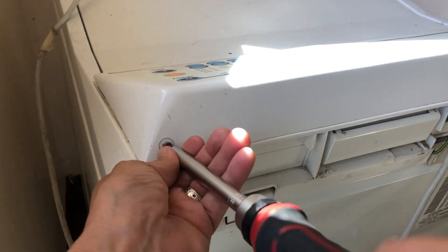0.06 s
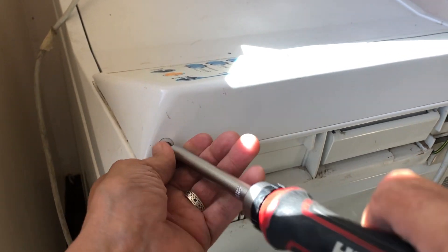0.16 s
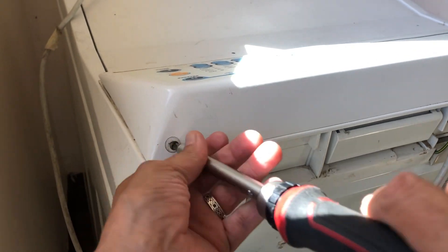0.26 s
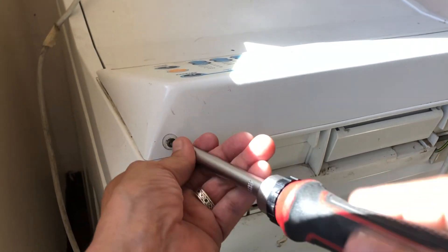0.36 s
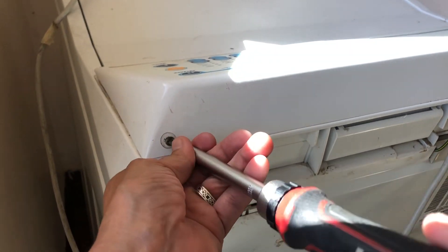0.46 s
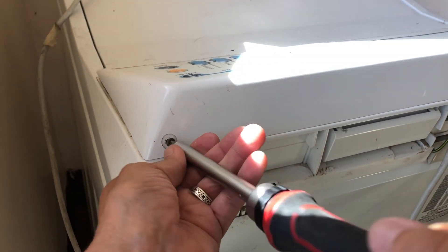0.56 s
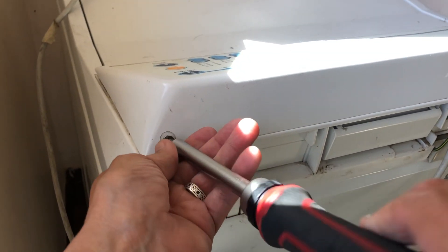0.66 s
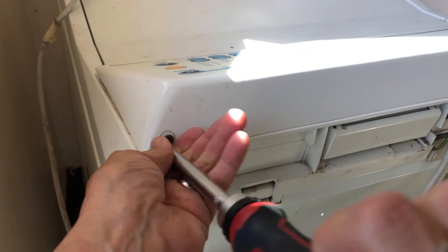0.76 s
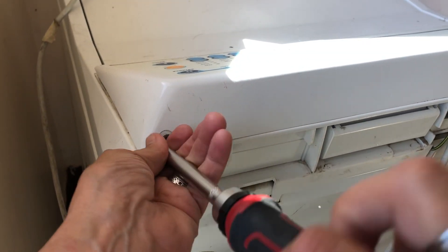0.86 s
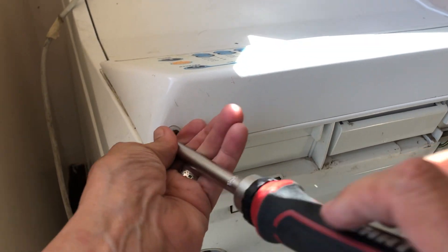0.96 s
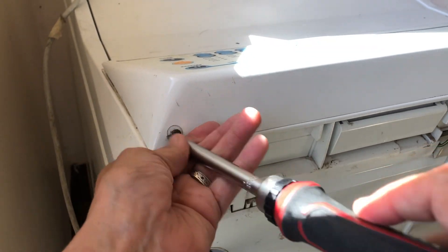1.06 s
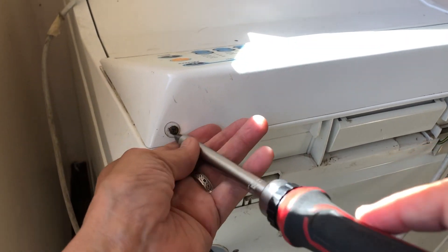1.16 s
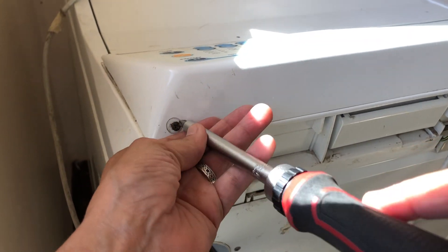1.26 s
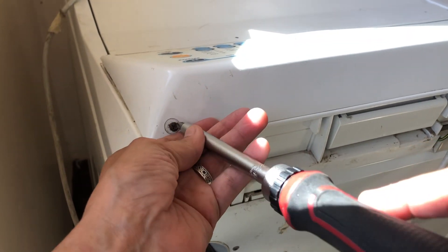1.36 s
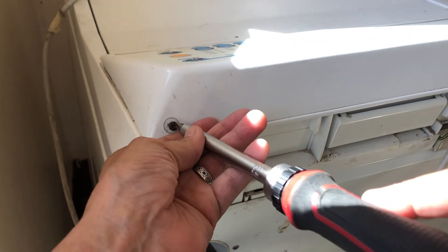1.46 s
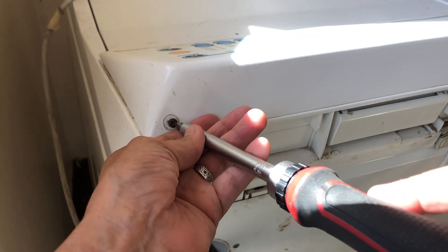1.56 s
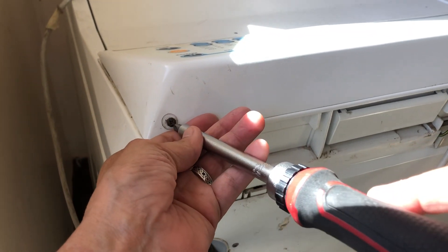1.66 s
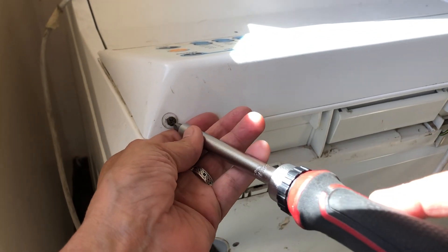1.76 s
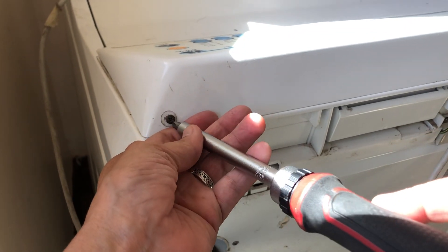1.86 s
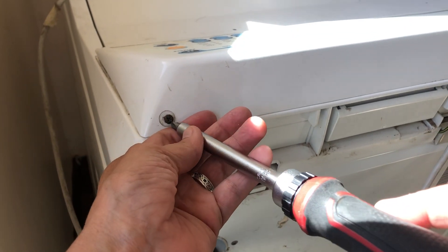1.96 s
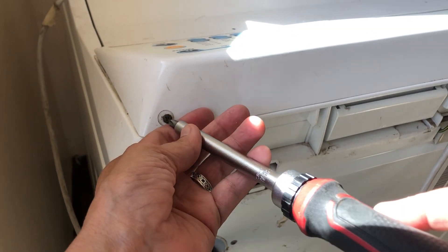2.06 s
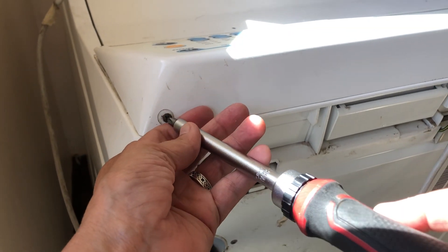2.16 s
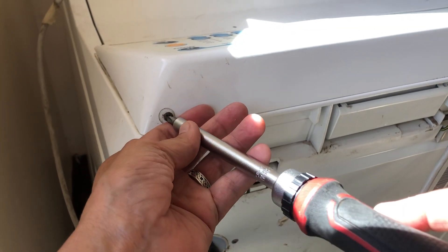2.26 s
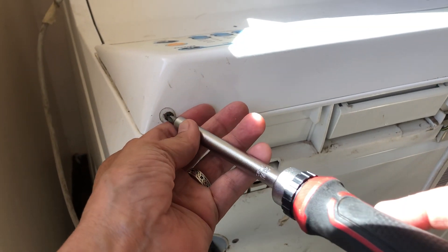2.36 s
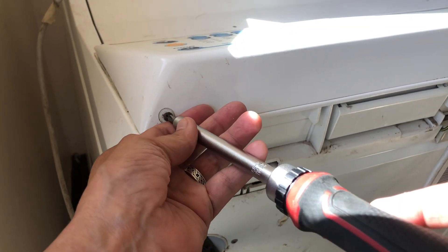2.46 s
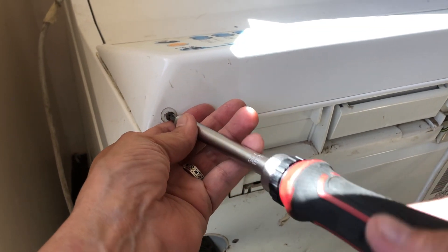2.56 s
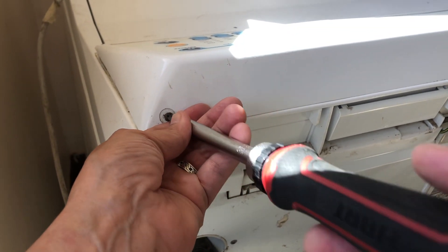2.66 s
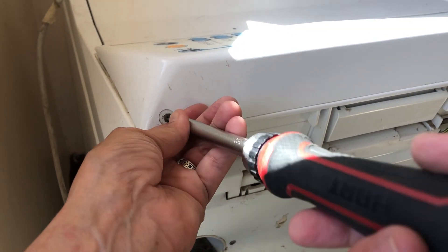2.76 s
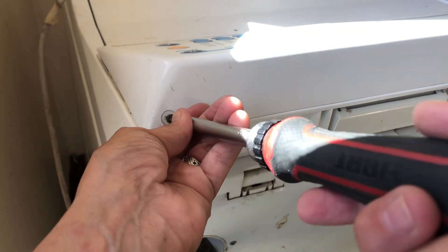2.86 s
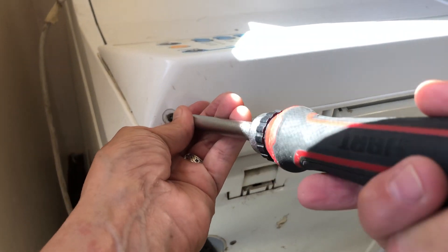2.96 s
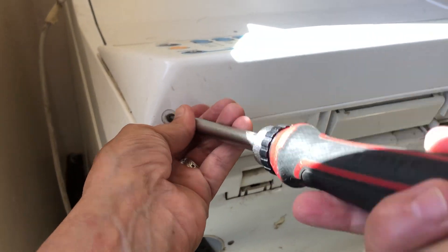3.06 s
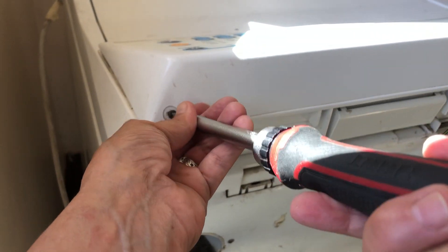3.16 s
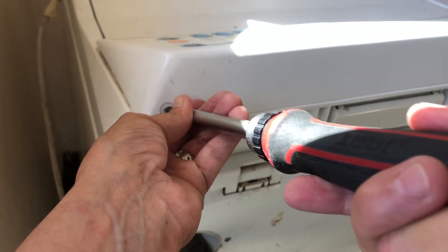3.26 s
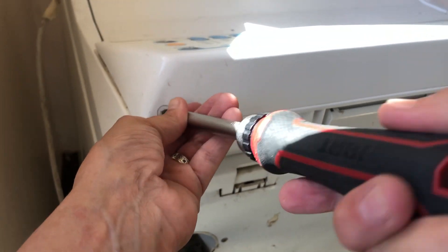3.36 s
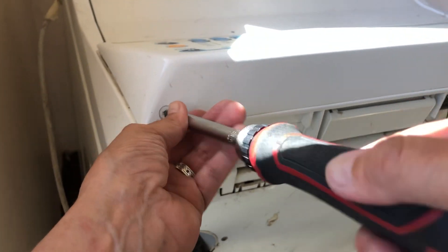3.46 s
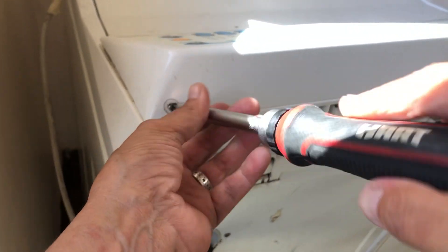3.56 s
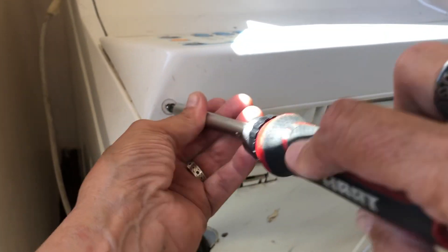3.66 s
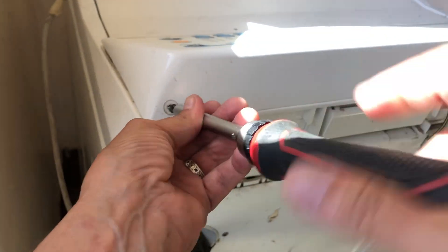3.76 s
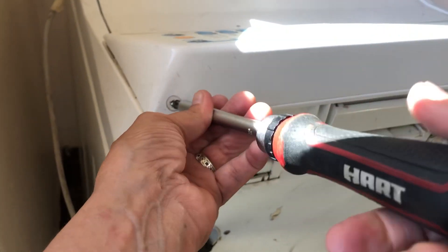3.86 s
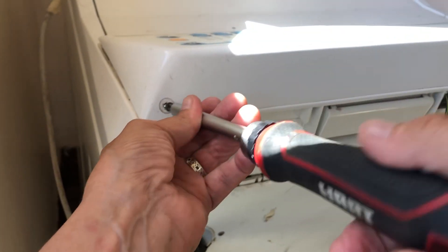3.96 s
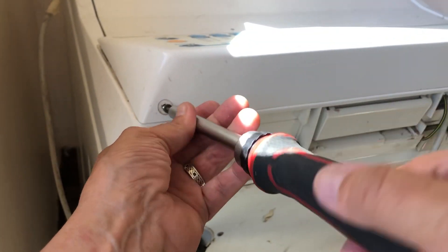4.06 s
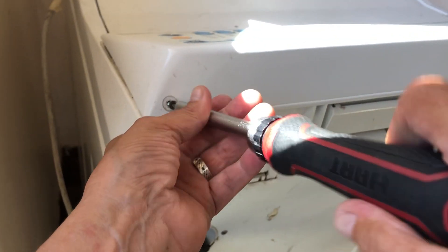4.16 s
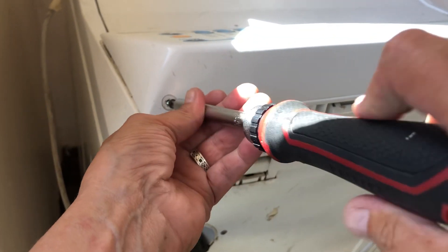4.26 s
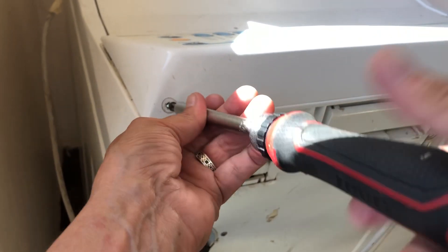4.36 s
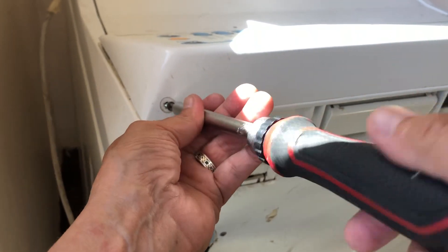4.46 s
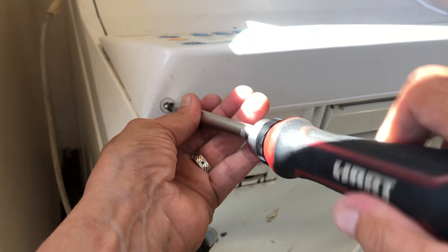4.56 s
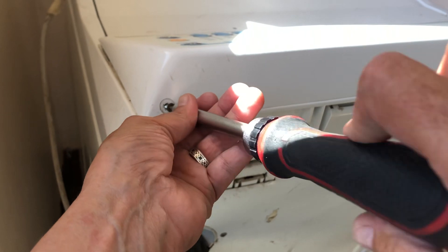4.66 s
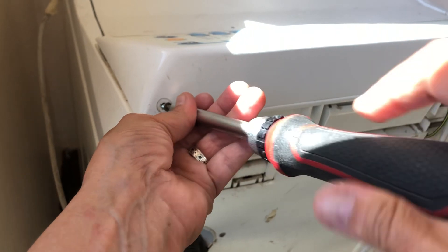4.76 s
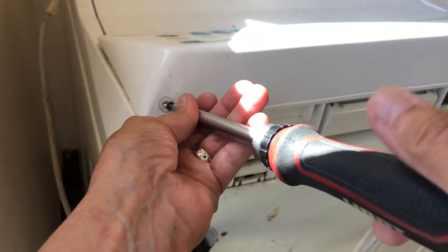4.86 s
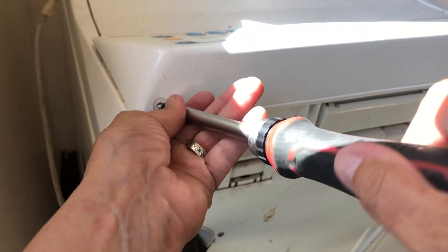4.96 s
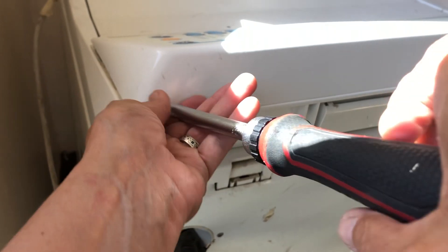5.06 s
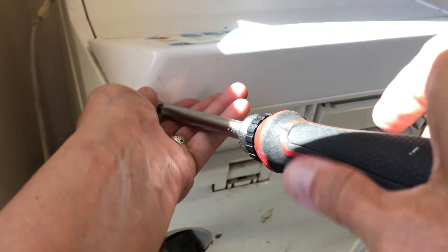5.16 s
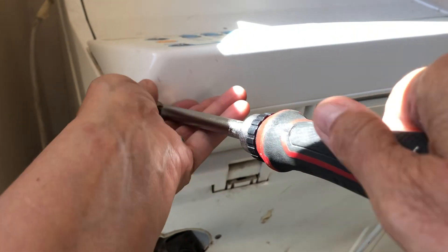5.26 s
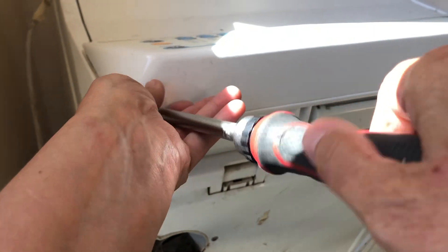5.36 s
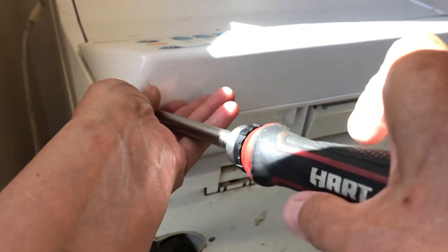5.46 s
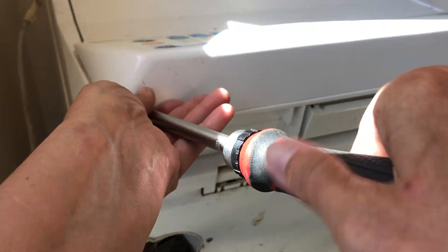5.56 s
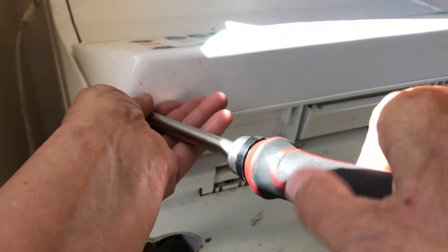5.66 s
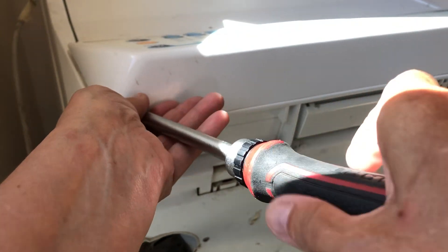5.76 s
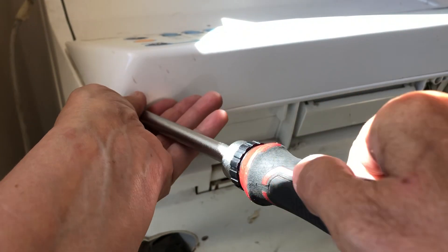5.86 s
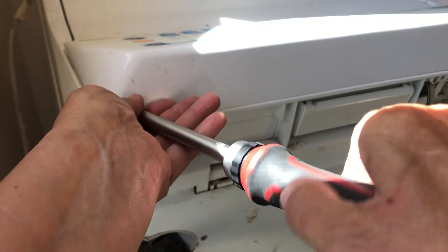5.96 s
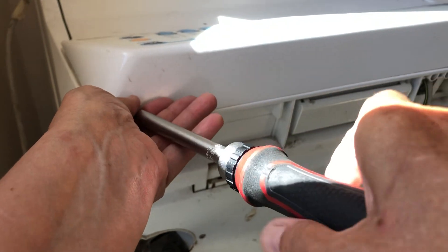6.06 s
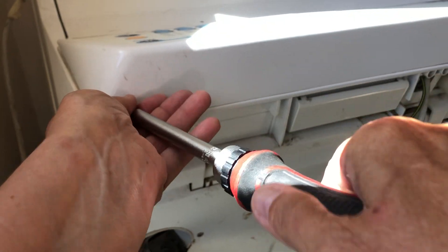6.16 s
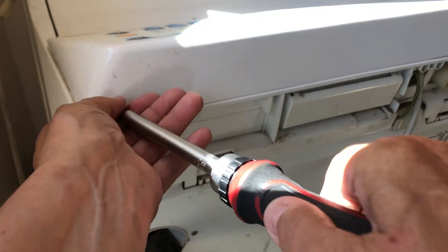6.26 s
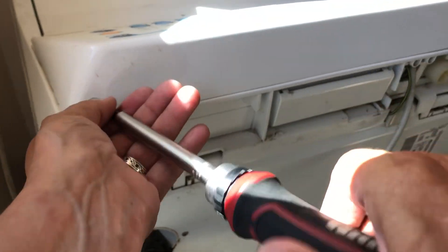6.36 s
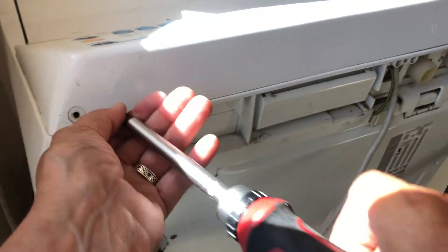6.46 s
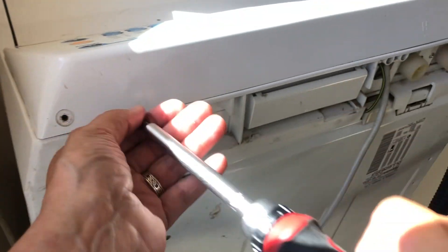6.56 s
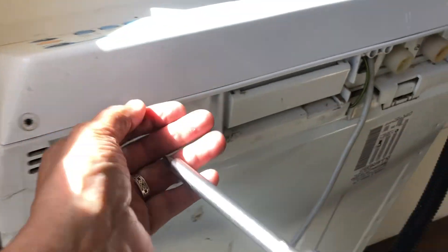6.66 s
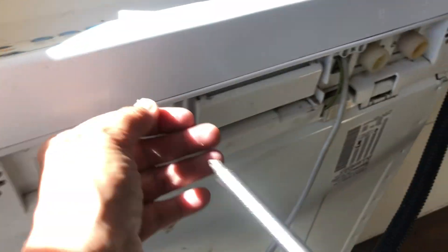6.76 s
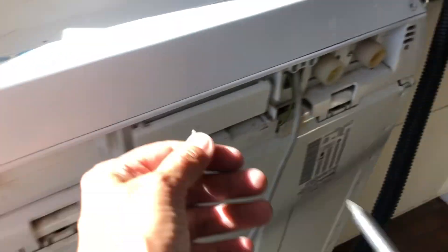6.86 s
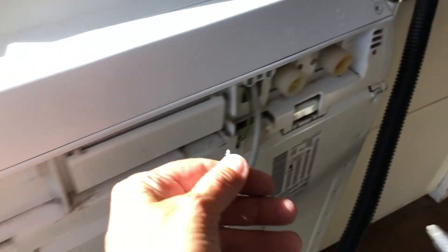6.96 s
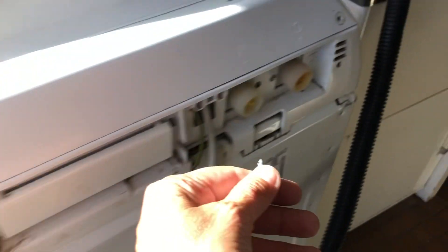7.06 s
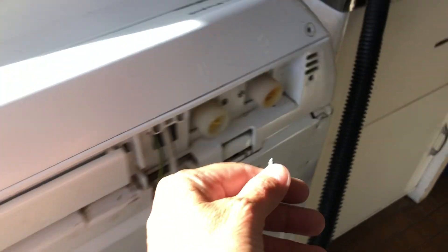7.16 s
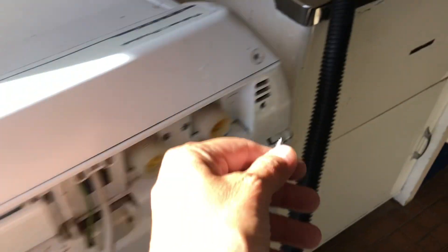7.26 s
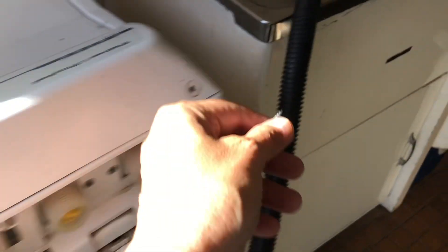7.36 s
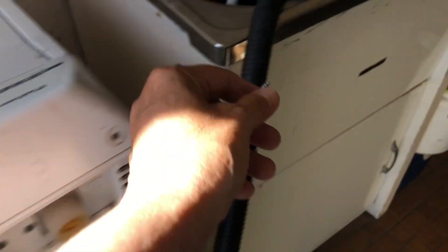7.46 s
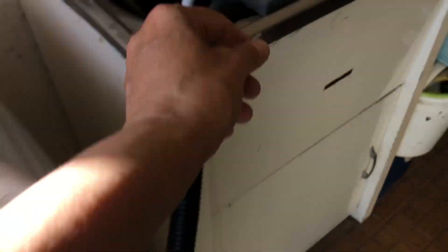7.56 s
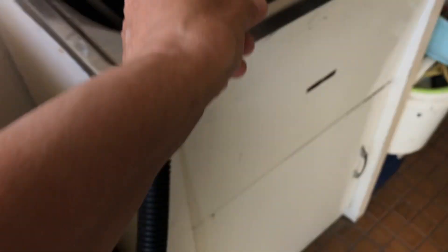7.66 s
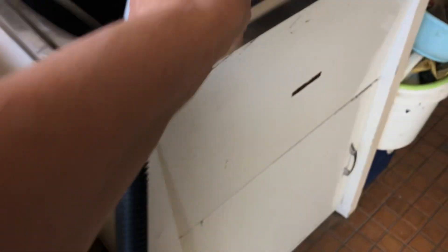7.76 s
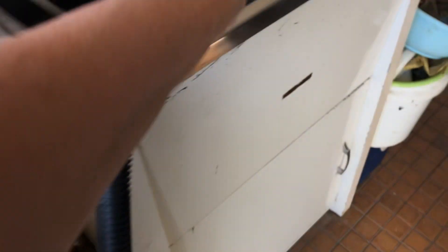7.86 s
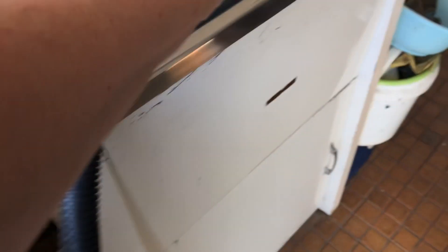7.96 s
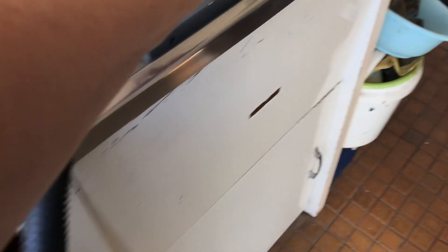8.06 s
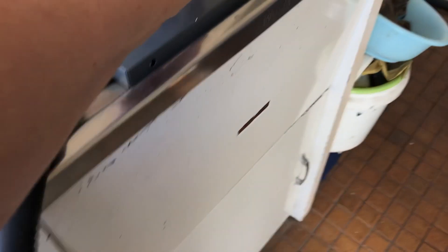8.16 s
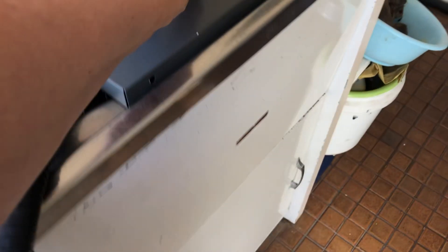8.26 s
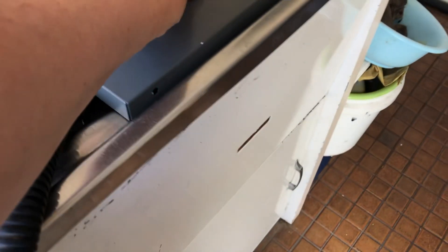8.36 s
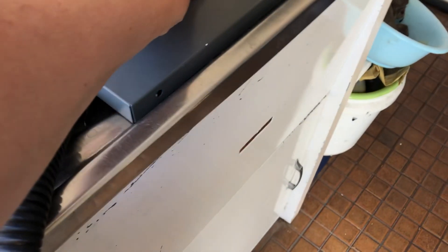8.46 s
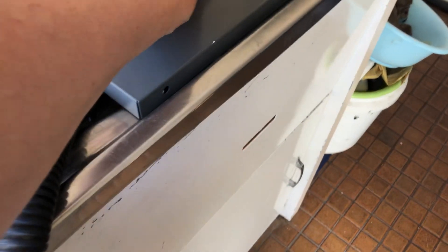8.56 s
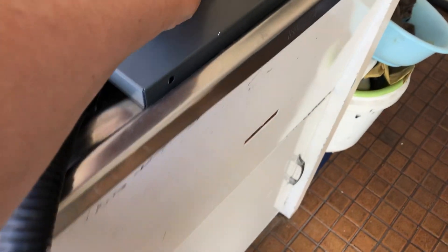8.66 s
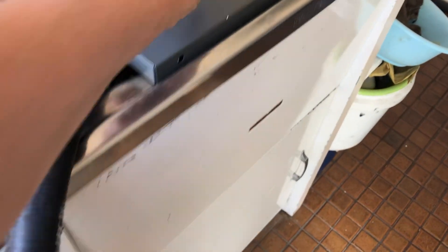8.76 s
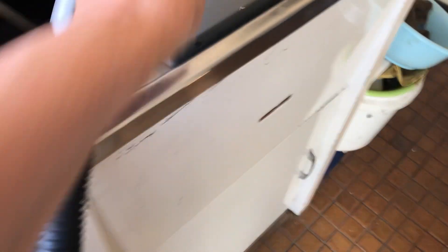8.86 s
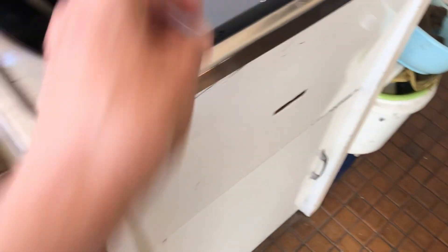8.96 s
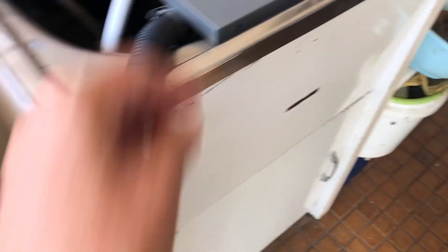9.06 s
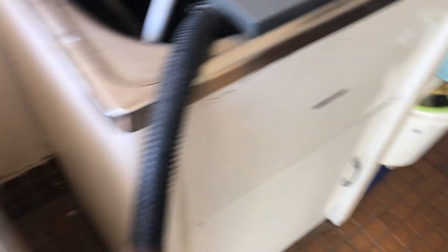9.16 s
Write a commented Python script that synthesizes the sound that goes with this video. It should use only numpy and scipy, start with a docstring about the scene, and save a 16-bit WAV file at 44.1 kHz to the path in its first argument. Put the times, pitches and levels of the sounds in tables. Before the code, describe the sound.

A ratchet screwdriver clicks and scrapes in a hollow metal appliance, then a small screw drops and bounces with a bright clatter on a hard top.

```python
"""A small hard room with a washing machine: a ratchet screwdriver backs a screw out of its plastic console.
The bit clicks and rings in the screw head, pushes boom in the hollow cabinet, and a palm slides round the grip.
Thread and skin squeak faintly, fingers bump the camera body, clothes rustle, and the screw drops on a hard top.
Struck parts are dying sines and decaying noise; sliding parts are grains of noise swelling with each stroke."""
import sys
import numpy as np
from scipy import signal
from scipy.io import wavfile
from scipy.ndimage import uniform_filter1d

SR = 44100
rng = np.random.default_rng(int(sys.argv[2]) if len(sys.argv) > 2 else 0)


def to_wav(sig):
    """Store sig (one row per channel, or 1-D mono) as 16-bit WAV at the path in sys.argv[1].

    Samples outside -1..1 are clipped; the rate is SR.
    """
    pcm = np.clip(np.atleast_2d(sig), -1, 1) * 32767
    pcm = np.round(pcm).astype(np.int16)
    wavfile.write(sys.argv[1], SR, pcm.T)  # frames by channels


N = 406602
TIME = np.arange(N) / SR
RING = np.arange(SR) / SR  # one second

# The bit catching in the screw head. Each row: start in seconds, relative strength in dB, main ring in Hz,
# main ring over the rest of the click in dB, treble tilt in dB.
CLICKS = [(0.0218, -31, 2770, -9, -3), (0.0386, -30, 2960, 1, 2), (0.081, -40.5, 3200, -7, 10),
          (0.3319, -29.5, 5000, -11, 13), (0.4851, -35.5, 2660, 9, 6), (0.5486, -13, 2600, -5.5, 0),
          (0.7239, -31.5, 3130, -4, -5), (0.7469, -22.5, 3350, -9, 11.5), (0.8094, -22, 5200, -1, 0),
          (1.0735, -26.5, 2880, 1, 2), (1.3829, -39, 2490, -9, -3), (3.063, -38.5, 3480, -3, 4),
          (3.0782, -36, 3470, 2, 0), (3.328, -34, 2800, -6, 5), (3.717, -25, 3310, -3.5, 3),
          (3.946, -23.5, 4800, -2, 2), (4.304, -26, 3620, -10, -17), (4.468, -19.5, 3240, -5, 3.5),
          (4.7308, -18.5, 3150, -0.5, 6), (4.9015, -21.5, 4900, -2.5, -3), (5.3688, -33, 2600, -12, -6),
          (5.924, -20.5, 4000, 0, 1), (6.2538, -27.5, 2350, -8, -1), (6.574, -38.5, 3340, 0, 13),
          (6.5965, -40, 3250, 8, -3)]
# Skin sliding on the grip and shaft. Each row: crest in seconds, length in seconds, relative level in dB.
STROKES = [(.14, 0.22, -66.5), (.36, 0.14, -54.5), (0.75, 0.054, -51), (1.042, 0.12, -64),
           (2.67, 0.21, -70), (3.593, 0.28, -64.5), (3.765, 0.092, -57.5), (4.175, 0.15, -64.5),
           (4.338, 0.21, -60), (4.612, 0.11, -57.5), (4.777, 0.21, -61), (5.043, 0.11, -54),
           (5.19, .12, -63), (5.41, .11, -55), (5.715, 0.08, -54), (6.004, 0.083, -54), (6.414, 0.081, -58),
           (6.815, 0.034, -62.5)]
# Room echo. Each row: frequency in Hz, t60 in seconds.
ROOM_DECAY = [(150, 0.45), (1000, 0.44), (3000, 0.39), (6000, 0.33), (11000, 0.21), (16000, 0.2)]


def amp(db):
    """Decibels to gain."""
    return 10 ** (np.asarray(db) / 20)


def evened(x):
    """Scales to rms 1."""
    return x / np.sqrt(np.mean(x ** 2) + 1e-20)


def unit(x):
    """Scales to energy 1."""
    return x / np.sqrt(np.sum(x ** 2) + 1e-20)


def read(points, hz):
    """Interpolates a table on a log-frequency axis."""
    f, value = np.transpose(points)
    return np.interp(np.log(hz + 1), np.log(f + 1), value)


def level(rows):
    """Gain over time from rows (s, dB)."""
    return amp(np.interp(TIME, *np.transpose(rows)))


def add(mix, s, sound):
    """Mixes a sound in at time s."""
    part = mix[max(round(s * SR), 0):][:len(sound)]
    part += sound[:len(part)]


def colour(x, spectrum, size=4096):
    """Minimum-phase filter of unit energy, shaped by rows (Hz, relative dB)."""
    hz = abs(np.fft.fftfreq(size, 1 / SR))
    log_gain = np.log(amp(read(spectrum, hz)))
    taps = np.fft.ifft(np.exp(np.conj(signal.hilbert(log_gain)))).real
    return signal.oaconvolve(x, unit(taps[:size // 2]))[:len(x)]


def modes(table, t, stretch=1, spread_db=0):
    """Dying sines from rows (Hz, dB, t60 s); spread_db weights them anew at each call."""
    out = 0
    for hz, db, t60 in table:
        gain = amp(db + spread_db * rng.standard_normal())
        out = out + gain * 1000 ** (-t / t60) * np.sin(2 * np.pi * hz * stretch * t)
    return out


def tail(decay):
    """Countless modes or echoes: noise whose bands each die at their own speed."""
    hz, t, z = signal.stft(rng.standard_normal(SR), SR, nperseg=256)
    dying = z * amp(-60 * t / read(decay, hz)[:, None])
    return unit(signal.istft(dying, SR, nperseg=256)[1][:SR])


def grit(count, grain_db):
    """Friction: a dense run of tiny slips of uneven size, 16 samples each."""
    size = amp(grain_db * np.minimum(rng.exponential(1, count // 16 + 1), 5))
    return evened(rng.standard_normal(count) * np.repeat(size, 16)[:count])


def drift(count, size):
    """Slow random curve of rms 1, smoothed twice over size samples."""
    smooth = uniform_filter1d(rng.standard_normal(count), size)
    return evened(uniform_filter1d(smooth, size))


def swells(rows, rise_share=0.62, fullness=0.7):
    """A sliding contact speeds up to a crest and stops: gain from rows (crest s, length s, dB)."""
    out = np.zeros(N)
    for crest, length, db in rows:
        rise = rise_share * length
        ramp = np.interp(RING[:round(length * SR)], [0, rise, length], [0, 1, 0])
        add(out, crest - rise, amp(db) * ramp ** fullness)
    return out


def room(x, wet_db=-16):
    """Adds the small hard room's echo by convolution with a decaying noise tail."""
    return x + amp(wet_db) * signal.fftconvolve(x, tail(ROOM_DECAY))[:N]


def room_noise():
    """Coloured room noise whose level drifts slowly."""
    # Each row: frequency in Hz, relative level in dB.
    air_spectrum = [(25, -30.5), (53, 3.5), (76, -4.5), (137, -7), (326, -5), (373, -4.5), (531, -6),
                    (659, -8.5), (3080, -20), (3920, -19), (16000, -32)]
    # Each row: time in seconds, level in dB.
    air_db = [(0, -59.5), (2, -67.5), (3, -64), (4.5, -60.5), (6.5, -62.5), (9.2, -61)]
    return level(air_db) * evened(colour(rng.standard_normal(N), air_spectrum))


def cabinet(walls_db=-1, grind=0.28, rattle_grain_db=6, lean_ring=0.68, lean_db=-1):
    """Each shove or click is a push that grinds briefly: the console rattles, the big cabinet booms on."""
    # Hollow cabinet modes. Each row: frequency in Hz, relative level in dB, t60 in seconds.
    cabinet_modes = [(88, -11, .7), (145, 1, .8), (173, -6, .6), (212, -11, .45), (260, -4, .55),
                     (320, -8, .3), (368, -6, .3), (420, -3, .2), (530, 0, .14), (630, -3, .11),
                     (755, -9, .15)]
    # Sheet-metal walls, then plastic console. Each row: frequency in Hz, relative level in dB.
    wall_spectrum = [(35, -32.5), (80, -9.5), (150, -3), (280, -3), (520, -1.5), (750, -13.5),
                     (1200, -24.5), (3000, -58)]
    console_spectrum = [(300, -42), (700, -2), (1200, 1.5), (1750, -2), (2400, -5.5), (5000, -9.5),
                        (8000, -16), (15000, -29)]
    # Walls and console. Each row: frequency in Hz, t60 in seconds.
    shell_decay = [(100, 1), (300, 0.47), (600, 0.28), (1500, 0.27), (5000, 0.115), (12000, 0.06)]
    # Murmur under the leaning hand. Each row: time in seconds, relative level in dB.
    lean = [(0, -49), (.55, -53.5), (.9, -44.5), (1.4, -51), (2, -59.5), (2.9, -61), (3.12, -54),
            (3.4, -56.5), (4.8, -49.5), (5.3, -56.5), (6.1, -53.5), (7.1, -67)]
    # The tool shoving the console. Each row: start in seconds, grinding decay in seconds,
    # cabinet boom in dB, plastic rattle over the boom in dB.
    shoves = [(0.316, 0.015, -40.5, -10), (.726, 0.01, -47, -5), (.753, 0.011, -35.5, -14),
              (.811, 0.018, -39, -12), (1.076, 0.031, -48, -2.5), (1.115, 0.039, -47.5, -2.5),
              (1.45, 0.018, -50.5, -4.5), (2.375, 0.02, -48, -13), (3.024, 0.028, -48, -14.5),
              (3.683, 0.028, -46, -14.5), (5.741, 0.0058, -51.5, -16), (6.256, 0.0039, -46.5, -4.5)]
    # The console springing back. Each row: frequency in Hz, level in dB, t60 in seconds.
    spring = [(249, -39, .25), (480, -39.5, 0.37), (522, -46, 0.61), (986, -49.5, 0.23), (1256, -48, 0.18)]
    knock_s, knock_rattle_db = 0.0027, -6
    knock_db, knock_follow = -36.5, 0.62  # boom for a 0 dB click; dB of boom per dB of click
    loose_s, loose_db = 5.2, -10  # hanging by its last threads, the screw passes on less of each click
    free_s = 6.26  # the screw comes free

    ring = unit(modes(cabinet_modes, RING))
    walls = unit(colour(tail(shell_decay), wall_spectrum))
    murmur = signal.fftconvolve(grit(N, grain_db=7.0), lean_ring * ring + walls)[:N]
    hand = np.hypot(amp(lean_db) * level(lean), swells(STROKES))
    out = hand * evened(colour(murmur, [(280, 1), (800, -13)]))  # a soft hand excites mostly the lows

    knocks = []
    for s, db, *_ in CLICKS:
        boom_db = knock_db + knock_follow * db + loose_db * (s > loose_s)
        knocks.append((s, knock_s, boom_db, knock_rattle_db))

    t = RING[:SR // 4]
    first = round(.06 * SR)  # levels are set over the first 60 ms
    for s, length, boom_db, rattle_db in list(shoves) + knocks:
        slips = unit(grit(len(t), rattle_grain_db) * np.exp(-t / length))
        push = (t == 0) + grind * np.sqrt(length / .001) * slips
        body = ring + amp(walls_db) * unit(colour(tail(shell_decay), wall_spectrum))
        boom = signal.fftconvolve(push, body)
        rattle = signal.fftconvolve(slips, colour(tail(shell_decay), console_spectrum))
        add(out, s, amp(boom_db) * boom / np.std(boom[:first]))
        add(out, s, amp(boom_db + rattle_db) * rattle / np.std(rattle[:first]))
    add(out, free_s, modes(spring, RING))
    return out


def palm(hiss_db=1, rasp_db=-3.0, flutter_db=1.5):
    """Skin hisses over the rubber grip and rasps the tool, swelling to a crest in each stroke."""
    # Each row: frequency in Hz, relative level in dB.
    hiss_spectrum = [(1500, -43), (5000, -8), (8000, -4.5), (11000, -2.5), (15500, -3.5)]
    rasp_spectrum = [(300, -14), (900, 0), (1800, -10), (2700, 4.5), (4300, -1), (7000, -5), (10000, -20),
                     (16000, -43)]
    grip = swells(STROKES) * amp(flutter_db * drift(N, size=400))
    hiss = colour(grit(N, grain_db=3), hiss_spectrum)
    rasp = colour(grit(N, grain_db=3.5), rasp_spectrum)
    return grip * (amp(hiss_db) * hiss + amp(rasp_db) * rasp)


def bit(main_cycles=26, seat_s=.00038, snap_db=-2, snap_s=0.0017, close_s=0.00083, wet_db=-11, click_db=8):
    """The bit touches a slot flank, then seats and rings the steel; panel and room answer the snap."""
    # Steel shaft and bit. Each row: frequency in Hz, relative level in dB, t60 in seconds.
    steel = [(2600, -10, 0.024), (3720, 0.5, 0.0055), (5200, -1, 0.006), (6440, -2.5, 0.0052),
             (7870, -5.5, 0.004)]
    snap_spectrum = [(500, -4.5), (5000, 5.5), (10000, -2.5), (16000, -17)]
    answer_spectrum = [(700, -13), (2700, 2), (7000, 1.0), (9500, -6), (16000, -21)]
    out, t = np.zeros(N), RING[:SR // 2]
    for s, db, hz, ring_db, treble_db in CLICKS:
        burst = rng.standard_normal(len(t)) * np.exp(-t / snap_s)
        click = amp(snap_db) * unit(colour(burst, snap_spectrum))
        add(click, seat_s, unit(modes(steel, t, rng.uniform(0.94, 1.02), spread_db=2.5)))
        click = unit(colour(click, [(4000, 0), (8000, treble_db)]))
        main_ring = unit(modes([(hz, 0, main_cycles / hz)], t))
        add(click, seat_s, amp(ring_db) * main_ring)
        click = click * (1 - np.exp(-t / close_s))  # the contact takes a moment to close
        echoes = tail(ROOM_DECAY) * (1 + 2 * np.exp(-RING / 0.0023))
        answer = unit(colour(echoes, answer_spectrum))
        add(out, s, amp(db + click_db) * unit(click))
        add(out, s + seat_s, amp(db + click_db + wet_db) * answer)
    return out


def squeaks(catch_db=2.5, wander_hz=55):
    """Rubbing thread and skin catch unevenly and sing on one resonance that glides and wanders."""
    # Each row: start in seconds, end in seconds, first frequency in Hz, last frequency in Hz,
    # width in Hz, level in dB.
    squeak_rows = [(2.087, 2.34, 2360, 2340, 110, -76), (2.583, 2.704, 2570, 2620, 220, -66),
                   (3.417, 3.68, 2360, 2275, 90, -72), (5.648, 5.73, 3960, 4750, 800, -61),
                   (6.352, 6.462, 2630, 2630, 450, -65.5), (7.365, 7.48, 5930, 6960, 1600, -68.5)]
    out = np.zeros(N)
    for start, end, from_hz, to_hz, width_hz, db in squeak_rows:
        t = RING[:round((end - start) * SR)]
        catches = grit(len(t), catch_db) + 1j * grit(len(t), catch_db)
        waver = signal.fftconvolve(catches, t * np.exp(-np.pi * width_hz * t))[:len(t)]
        hz = np.linspace(from_hz, to_hz, len(t)) + wander_hz * drift(len(t), size=1500)
        rub = (waver * np.exp(2j * np.pi * np.cumsum(hz) / SR)).real
        add(out, start, amp(db) * evened(rub) * signal.windows.tukey(len(t), .5))
    return out


def bumps(bump_hz=373.6, creak_db=-46, creak_s=0.045, lead_s=.012, follow=0.18, skin_db=-21):
    """Fingers push the camera body: short dull tones; the grip creaks as it tightens and settles."""
    # Each row: start in seconds, peak level in dB, rise time in seconds (longer is softer).
    bump_rows = [(6.028, -38, 0.0022), (7.415, -52, 0.0061), (7.523, -18, 0.0015), (7.675, -50, 0.006),
                 (7.961, -51, 0.0026), (7.988, -47, .003), (8.011, -39, 0.0024), (8.034, -43.5, .001),
                 (8.542, -41, 0.002), (8.866, -27, 0.0015), (8.901, -40, 0.0013)]
    skin_spectrum = [(1000, -1.5), (1500, -14.5), (8000, -37.5)]
    creak_spectrum = [(60, -19), (200, -9.5), (380, 1), (600, -17.5), (1200, -24.5), (4000, -46.5)]
    out, creak, t = np.zeros(N), np.zeros(N), RING[:SR // 4]
    for s, db, rise_s in bump_rows:
        push = (t / rise_s) ** 2 * np.exp(-t / rise_s)
        tone = np.sin(2 * np.pi * bump_hz * t)
        skin = evened(colour(rng.standard_normal(len(t)), skin_spectrum))
        add(out, s, amp(db) * push / push.max() * (tone + amp(skin_db) * skin))
        away = np.maximum((TIME - s) / creak_s, (s - TIME) / lead_s)
        creak += amp(creak_db + follow * db) * np.exp(-away)
    return out + creak * colour(rng.standard_normal(N), creak_spectrum)


def clothes():
    """Cloth brushes softly as the arm moves: grainy friction noise under slow swells."""
    # Each row: crest in seconds, length in seconds, level in dB.
    rustles = [(6.92, 0.44, -63.5), (7.19, 0.22, -65.5), (7.43, .1, -76), (7.945, 0.12, -55),
               (8.83, 0.064, -63)]
    # Each row: frequency in Hz, relative level in dB.
    cloth_spectrum = [(300, -2), (800, -3), (1500, 4), (2200, -2), (3500, -1), (5000, -4), (8000, -11.5),
                      (16000, -20)]
    return swells(rustles) * colour(grit(N, grain_db=2.0), cloth_spectrum)


def dropped_screw(drop_db=7, direct_db=-8, tick_s=0.00048, near_t60=0.11, room_db=-3, ring_db=-11, echo_s=0.0035):
    """Each bounce is a hard tick, the ring of the top, and thick echoes from the corner and the room."""
    # Landing, bouncing, settling. Each row: start in seconds, relative level in dB.
    bounces = [(8.3305, 3), (8.3515, 2.5), (8.358, -9), (8.3642, 3.5), (8.431, -19)]
    # Each row: frequency in Hz, relative level in dB.
    clatter_spectrum = [(120, -13.5), (300, -16.5), (1300, -10.5), (2200, -11), (4000, -6), (6000, -3.5),
                        (8300, -1), (11000, -7), (15500, -10.5)]
    # Hard top. Each row: frequency in Hz, relative level in dB, t60 in seconds.
    top_modes = [(1260, -10, .42), (3887, -6, .3), (4542, -7, .3), (4862, -4, .3), (5728, -5, .28),
                 (7098, -3, .24), (7603, -1, .24), (8240, -1, .23), (8993, -1, .22), (10330, 0, .2)]
    out = np.zeros(N)
    for s, db in bounces:
        tick = unit(rng.standard_normal(SR) * np.exp(-RING / tick_s))
        corner = unit(rng.standard_normal(SR) * amp(-60 * RING / near_t60))
        echoes = (corner + amp(room_db) * tail(ROOM_DECAY)) * (1 - np.exp(-RING / echo_s))
        clatter = colour(amp(direct_db) * tick + echoes, clatter_spectrum)
        ring = unit(modes(top_modes, RING, rng.normal(1, 0.0013), spread_db=1.5))
        add(out, s, amp(db) * (clatter + amp(ring_db) * ring))
    return amp(drop_db) * out


def scene():
    """Sums all sources; palm and squeaks pass through the room echo."""
    rubbing = room(palm() + squeaks())
    mix = room_noise() + cabinet() + rubbing + bit() + bumps() + clothes() + dropped_screw()
    return mix[None]


def record(dry):
    """The recorder's low cut at 44 Hz and band limit at 15.9 kHz."""
    low_cut = signal.butter(6, 44, "high", fs=SR, output="sos")
    band_limit = signal.firwin(511, 15900, window=("kaiser", 9), fs=SR)
    return signal.oaconvolve(signal.sosfilt(low_cut, dry), band_limit[None], "same")


dry = scene()
out = record(dry)
to_wav(out)
```